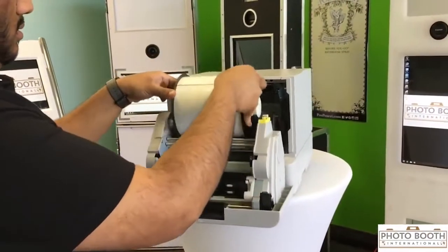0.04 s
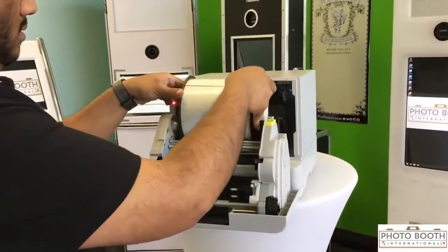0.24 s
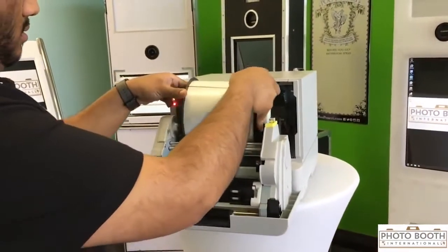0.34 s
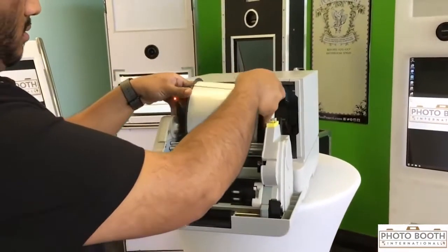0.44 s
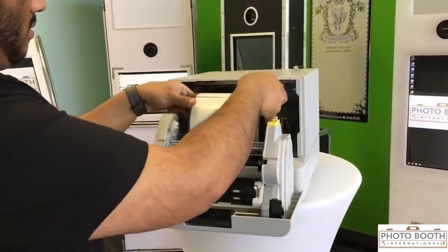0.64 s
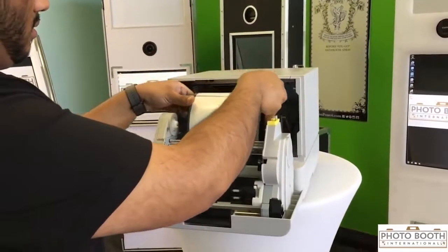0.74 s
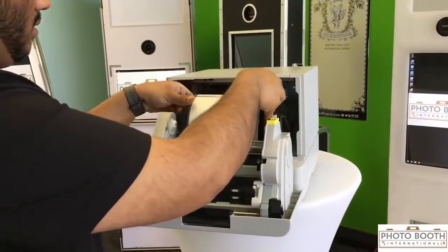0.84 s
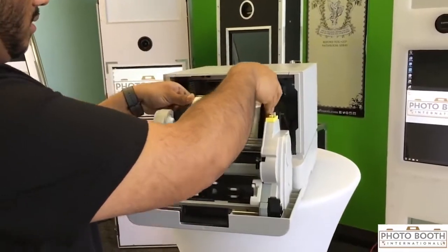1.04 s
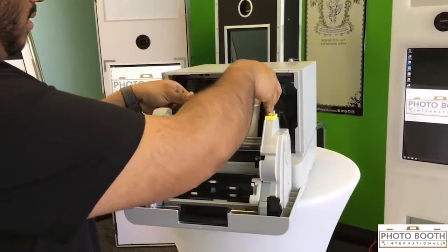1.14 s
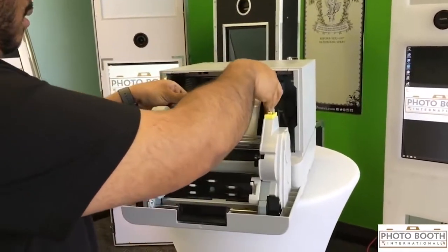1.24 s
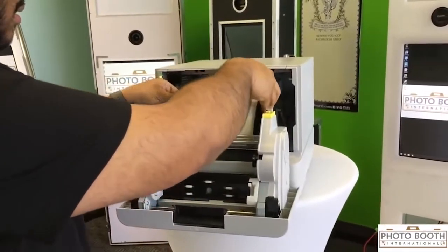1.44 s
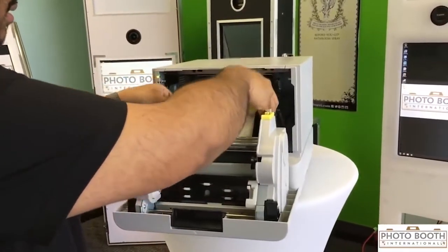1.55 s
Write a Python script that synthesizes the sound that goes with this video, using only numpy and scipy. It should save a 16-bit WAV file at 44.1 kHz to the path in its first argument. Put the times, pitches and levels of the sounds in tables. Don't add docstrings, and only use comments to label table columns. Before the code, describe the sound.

A paper roll is lowered into an open printer: light ticks and rustle, two moderate plastic snaps, then a loud crack with low thuds, followed by small clicks and faint squeaks in a humming room, close microphone.

```python
import sys
import numpy as np
from scipy import signal
from scipy.fft import rfft, irfft
from scipy.io import wavfile
from scipy.ndimage import uniform_filter1d

SR = 44100
rng = np.random.default_rng(int(sys.argv[2]) if len(sys.argv) > 2 else 0)


def boost(x):
    u = np.asarray(x, float) / 20
    return 10 ** u


def generate_wav(signal):
    frames = np.transpose(np.atleast_2d(signal))
    scaled = np.clip(frames, -1, 1) * 32767
    pcm = np.round(scaled).astype(np.int16)
    wavfile.write(sys.argv[1], SR, pcm)


N = 70560

# f/Hz, level/dB per Hz
AIR_SPECTRUM = [(12, -40), (20, -14.5), (102, 1.5), (479, -13), (1140, -17), (1510, -21), (3720, -27),
                (15200, -39.5), (16500, -72)]
# f/Hz, width/Hz, level/dB
DRONES = [(69.4, 9, -51.5), (239, 15, -58.5), (165.5, 16.1, -59)]
AIR_DB, AIR_PATCH_DB = -57, 1
HUM_HZ, HUM_DB = 242.2, -55.5

# t/s, level/dB
RUSTLE_LEVEL = [(0, -51), (.08, -61.5), (0.269, -50.5), (.32, -126), (.58, -57.5), (0.699, -46.5),
                (.86, -64), (1.0, -54), (1.2, -61), (1.35, -59), (1.459, -61.5), (1.6, -67.5)]
# f/Hz, level/dB per Hz
RUSTLE_SPECTRUM = [(200, 14.5), (600, 16), (1200, 9.5), (2500, -5.5), (6000, -18.5)]
RUSTLE_PATCH_DB = 2.5

# t/s, level/dB, centre f/Hz, length/s
TOUCHES = [(0.0144, -36, 5100, 0.0022), (0.162, -49.5, 4300, 0.0071), (0.194, -49, 2000, 0.0081),
           (.221, -38.5, 2800, 0.0076), (0.953, -37, 1090, 0.022), (0.417, -37, 890, 0.017),
           (0.901, -62, 1060, 0.0065), (0.932, -56.5, 2630, 0.0025), (0.952, -45, 2000, 0.002),
           (.957, -41.5, 6080, 0.0042), (0.9624, -39, 3250, 0.011), (0.977, -52.5, 2370, 0.026),
           (1.046, -42, 760, 0.0061), (1.052, -51, 4150, 0.0075), (0.618, -36, 10600, 0.036),
           (0.82, -59.5, 7560, 0.023), (1.139, -44.5, 1820, 0.0063), (1.16, -51, 6000, 0.0018),
           (1.188, -55.5, 6000, 0.00197), (1.225, -59, 6000, 0.0039), (1.289, -60.5, 1520, .01),
           (1.326, -44, 1370, 0.0035), (1.408, -53, 9400, 0.026), (1.418, -44.5, 1100, 0.0051),
           (1.336, -57, 3420, 0.0067), (1.5535, -49.5, 1970, 0.0076), (1.594, -51, 3240, 0.0024),
           (0.838, -52.5, 1200, 0.041), (0.619, -25, 717, 0.032), (1.004, -53, 4030, 0.0087)]
# f/Hz, level/dB, t60/s
HOUSING_MODES = [(761, 10.5, 0.042), (1090, 25.5, 0.02), (1370, 18, 0.017), (1952, 9, 0.016),
                 (2800, -4.5, 0.031), (3250, 2.5, 0.032), (3772, 0, 0.087), (4350, -2, 0.049),
                 (5260, -5, .03), (6000, 2.5, .012), (6580, -3, 0.052), (8700, -10, .02),
                 (10500, -47, .015)]
TOUCH_WIDTH_OCTAVES, TOUCH_SPREAD_DB, TOUCH_HISS_DB = 0.59, 2.5, -6.5
HOUSING_MAX_CYCLES, RUB_S = 40, 0.02

# t/s, level/dB, contact cutoff f/Hz
THUDS = [
    (.1675, -32.5, 503),
    (0.199, -37.5, 670),
    (.245, -74, 510),
    (.61, -27, 703),
    (0.633, -31, 700),
    (.66, -27, 505),
    (0.691, -30.5, 690),
    (0.719, -39, 610),
    (0.744, -74, 484),
    (0.031, -42.5, 393),
]
# f/Hz, level/dB, t60/s
CHASSIS_MODES = [(78.4, -4.5, 0.2), (126, -2.5, 0.086), (205.3, 0, 0.22), (255.7, -0.5, 0.08),
                 (326, -4.5, 0.14), (390, -4.5, 0.21), (440.5, -1, 0.034), (521, 1.5, 0.072),
                 (589.5, 0, .08), (828, -1, 0.084)]
THUD_SPREAD_DB = 2.5

# t/s, level/dB, rise/s, decay/s
SNAPS = [
    (0.2256, -26, 0.0021, 0.0044),
    (0.4131, -25, 0.0021, 0.0044),
    (0.6077, -12.5, 0.0036, 0.0021),
]
# f/Hz, level/dB
SNAP_1_MODES = [(830, -5.5), (2440, -5), (3250, -24), (3750, 3), (4550, 2), (5600, -37), (6170, -6.5),
                (7000, -2), (8300, -21)]
SNAP_2_MODES = [(840, -8), (1090, -26), (1690, -15), (2300, -11.5), (3100, -0.5), (4000, -1.5), (5200, -8),
                (6600, -7), (9300, -19), (15000, -12)]
SNAP_3_MODES = [(1080, -12.5), (2340, -0.5), (2920, -12), (3160, -1), (3350, -6.5), (3880, -10.5),
                (5320, -4.5), (6740, 5.5), (7300, -32.5), (8100, -14), (10150, -6.5), (12700, -13.5)]
# f/Hz, level/dB per Hz
CRACK_1_SPECTRUM = [(290, -49.5), (500, -32), (2330, -5.5), (3020, -5.5), (3750, -1), (16000, -19)]
CRACK_2_SPECTRUM = [(290, -0.5), (500, -20), (1110, -7.5), (1440, -12), (6610, -16), (16000, -26.5)]
CRACK_3_SPECTRUM = [(180, -32), (300, -3), (2070, -6.5), (3240, -0.5), (5700, -13.5), (6740, -4.5),
                    (7690, -8), (16000, -22.5)]
# f/Hz, level/dB, t60/s
SHAFT_MODES = [(6750, -50, .4)]
FLANGE_T60_3KHZ_S, CRACK_DB, SLIPS_PER_S = 0.019, -0.5, 5000

# t/s, slip rate f/Hz, level/dB
LOW_SQUEAK = [
    (1.122, 720, -65),
    (1.125, 720, -49),
    (1.14, 715, -55),
    (1.168, 710, -64),
]
HIGH_SQUEAK = [
    (1.36, 5800, -68),
    (1.367, 5650, -60),
    (1.383, 5450, -58),
    (1.385, 4450, -54),
    (1.393, 4300, -58),
    (1.395, 3700, -50),
    (1.403, 3750, -53),
    (1.405, 4420, -51),
    (1.422, 4200, -64),
]
LAST_SQUEAK = [
    (1.487, 1140, -65),
    (1.494, 1097, -65),
    (1.52, 1087, -58.5),
    (1.532, 1080, -68),
]
LOW_OVERTONES_DB = [0, -14, -16, -8, -9, -10]
HIGH_OVERTONES_DB = [0, -1, -10]
LAST_OVERTONES_DB = [-20, -20, -6, 0, -12, -7, -8, -14, -14, -7]
SQUEAK_JITTER, SQUEAK_FLUTTER_DB, SQUEAK_HISS_DB = 0.028, 4, -9

# f/Hz, t60/s
ROOM_T60 = [(100, 0.4), (700, 0.24), (2500, 0.28), (6000, 0.27), (14000, 0.083)]
ROOM_DB, THUD_ROOM_DB, ROOM_GAP_S = -5, -3, 0.0021
MODE_SEND_DB, SMALL_SEND_DB = -9, -6


def rms_one(x):
    return x / np.sqrt(np.mean(x ** 2) + 1e-20)


def peak_one(x):
    return x / np.sqrt(2 * uniform_filter1d(x ** 2, size=88).max())


def at_hz(points, hz):
    table_hz, values = np.array(points).T
    return np.interp(np.log(hz + 1), np.log(table_hz), values)


def colour(x, spectrum):
    hz = np.fft.rfftfreq(len(x), 1 / SR)
    return irfft(rfft(x) * boost(at_hz(spectrum, hz)), len(x))


def drift(rate_hz):
    r = np.exp(-2 * np.pi * rate_hz / SR)
    noise = rng.standard_normal(N + SR)
    return rms_one(signal.lfilter([1], [1, -2 * r, r * r], noise)[SR:])


def ring(clicks, hz, t60_s):
    r = boost(-60 / (max(t60_s, 0.002) * SR))
    w = 2 * np.pi * hz / SR
    return signal.lfilter([0, np.sin(w)], [1, -2 * r * np.cos(w), r * r], clicks + 1e-18)


def add(out, start_s, x):
    i = int(start_s * SR)
    out[i:i + len(x)] += x[:N - i]


def contact(rise_s, decay_s):
    t = np.arange(SR // 4) / SR
    env = np.minimum(t / max(rise_s, 1e-4), 1)
    env = env * np.exp(-np.maximum(t - rise_s, 0) / max(decay_s, 2e-4))
    slips = rng.standard_normal(len(t)) * (rng.random(len(t)) < SLIPS_PER_S / SR)
    slips[2] = 1
    return env, env * slips


def air():
    out = boost(AIR_DB + AIR_PATCH_DB * drift(3.3)) * rms_one(colour(rng.standard_normal(N), AIR_SPECTRUM))
    for hz, width_hz, db in DRONES:
        drone = ring(rng.standard_normal(N + SR), hz, 1.78 / width_hz)[SR:]
        out = out + boost(db) * rms_one(drone)
    phase = 2 * np.pi * HUM_HZ * np.arange(N) / SR + 0.5 * drift(1.1)
    return out + boost(HUM_DB + drift(3.1)) * np.sin(phase)


def rustle():
    s, db = np.transpose(RUSTLE_LEVEL)
    level_db = np.interp(np.arange(N) / SR, s, db) + RUSTLE_PATCH_DB * drift(22)
    return boost(level_db) * rms_one(colour(rng.standard_normal(N), RUSTLE_SPECTRUM))


def touches():
    out = np.zeros(N)
    for s, db, centre_hz, length_s in TOUCHES:
        env, slips = contact(0.26 * length_s, 1.51 * length_s)
        body = 0
        for hz, mode_db, t60_s in HOUSING_MODES:
            off_centre = np.log2(hz / centre_hz) / TOUCH_WIDTH_OCTAVES
            level_db = mode_db + TOUCH_SPREAD_DB * rng.standard_normal() - 9 * off_centre ** 2
            body = body + boost(level_db) * ring(slips, hz, min(t60_s, HOUSING_MAX_CYCLES / hz))
        edges_hz = [centre_hz / 2, min(centre_hz * 2, 16000)]
        band = signal.butter(2, edges_hz, "band", fs=SR, output="sos")
        body, hiss = signal.sosfilt(band, [body, env * rng.standard_normal(len(env))])
        body = min(RUB_S / length_s, 1) ** 2 * peak_one(body)
        add(out, s, boost(db) * (body + boost(TOUCH_HISS_DB) * peak_one(hiss)))
    return out


def thuds():
    out = np.zeros(N)
    for s, db, cutoff_hz in THUDS:
        blow = signal.lfilter(*signal.butter(2, cutoff_hz, fs=SR), np.eye(1, SR // 3)[0])
        body = 0
        for k, (hz, mode_db, t60_s) in enumerate(CHASSIS_MODES):
            level = boost(mode_db + THUD_SPREAD_DB * rng.standard_normal())
            body = body + level * (-1) ** k * ring(blow, hz, t60_s)
        add(out, s, boost(db - 9) * body)
    return out


def snaps():
    body, crack, far = np.zeros((3, N))
    mode_tables = [SNAP_1_MODES, SNAP_2_MODES, SNAP_3_MODES]
    spectra = [CRACK_1_SPECTRUM, CRACK_2_SPECTRUM, CRACK_3_SPECTRUM]
    high_pass = signal.butter(2, 600, "high", fs=SR)
    for (s, db, rise_s, decay_s), modes, spectrum in zip(SNAPS, mode_tables, spectra):
        env, slips = contact(rise_s, decay_s)
        tone = 0
        for hz, mode_db in modes:
            t60_s = min(FLANGE_T60_3KHZ_S * (3000 / hz) ** 0.39, 0.03)
            tone = tone + boost(mode_db) * ring(slips, hz, t60_s)
        add(body, s, boost(db) * peak_one(signal.lfilter(*high_pass, tone)))
        noise = colour(rng.standard_normal(len(env)), spectrum)
        hiss = boost(db + CRACK_DB) * peak_one(env * noise)
        add(crack, s, hiss)
        click = colour(np.eye(1, len(env), 200)[0], spectrum)
        add(far, s, np.std(hiss) * rms_one(click))
    last_s, _, _, last_decay_s = SNAPS[2]
    strike = np.zeros(N)
    strike[int((last_s + last_decay_s) * SR)] = 1
    for hz, db, t60_s in SHAFT_MODES:
        crack += boost(db) * ring(strike, hz, t60_s)
    return body, crack, far


def squeak(course, overtones_db):
    s, hz, db = np.transpose(course)
    t = np.arange(N) / SR
    rate_hz = np.interp(t, s, hz)
    phase = 2 * np.pi * np.cumsum(rate_hz * (1 + SQUEAK_JITTER * drift(287))) / SR
    tone = 0
    for k, overtone_db in enumerate(overtones_db, 1):
        level = boost(overtone_db + SQUEAK_FLUTTER_DB * drift(49))
        tone = tone + level * np.sin(k * phase) * (k * rate_hz < 15000)
    high_pass = signal.butter(2, 5000, "high", fs=SR, output="sos")
    hiss = signal.sosfilt(high_pass, rng.standard_normal(N))
    level_db = np.interp(t, s, db, left=-200, right=-200)
    return boost(level_db) * (tone + boost(SQUEAK_HISS_DB) * hiss)


def room(x):
    t = np.arange(SR) / SR
    edges_hz = 50 * 2 ** np.arange(0, 8.6, 0.5)
    white = rng.standard_normal((2, SR))
    echo = 0
    for k, (low, high) in enumerate(zip(edges_hz, edges_hz[1:])):
        band_pass = signal.butter(2, [low, high], "band", fs=SR, output="sos")
        band = signal.sosfilt(band_pass, white[k % 2])
        echo = echo + band * boost(-60 * t / at_hz(ROOM_T60, np.sqrt(low * high)))
    echo = echo * np.clip(t / ROOM_GAP_S - 1, 0, 1)
    return signal.fftconvolve(x, echo / np.sqrt(np.sum(echo ** 2)))[:N]


def scene():
    small = rustle() + touches()
    low = thuds()
    body, crack, far = snaps()
    small += squeak(LOW_SQUEAK, LOW_OVERTONES_DB)
    small += squeak(HIGH_SQUEAK, HIGH_OVERTONES_DB)
    small += squeak(LAST_SQUEAK, LAST_OVERTONES_DB)
    send = boost(MODE_SEND_DB) * body + far + boost(SMALL_SEND_DB) * small
    wet = room(boost(ROOM_DB) * send + boost(THUD_ROOM_DB) * low)
    low_pass = signal.cheby2(10, 40, 16050, fs=SR, output="sos")
    soft = signal.sosfilt(low_pass, small + low + wet + air())
    return (body + crack + soft)[None]


def band_limit(x):
    return signal.sosfilt(signal.butter(12, 16820, fs=SR, output="sos"), x)


def record(dry):
    x = signal.sosfilt(signal.butter(3, 48, "high", fs=SR, output="sos"), dry)
    x = signal.sosfilt(signal.cheby2(10, 50, 16900, fs=SR, output="sos"), x)
    return band_limit(x)


dry = scene()
out = record(dry)
generate_wav(out)
```